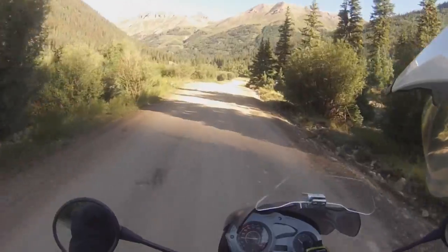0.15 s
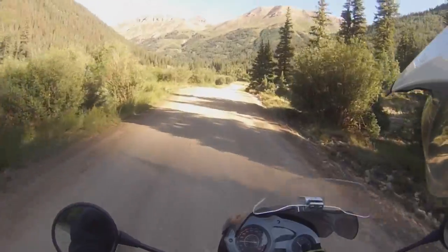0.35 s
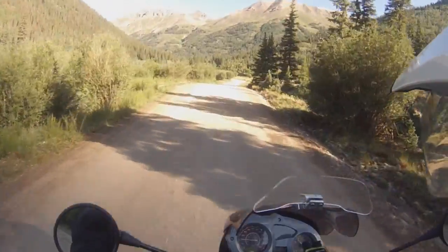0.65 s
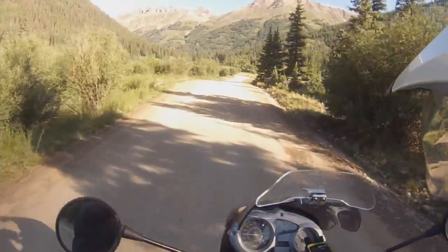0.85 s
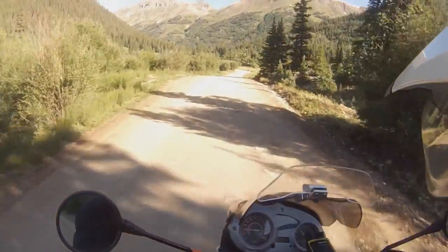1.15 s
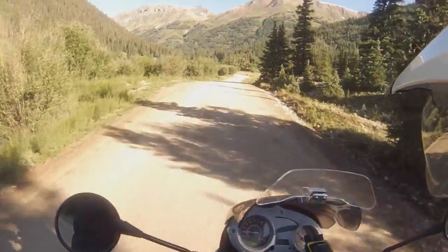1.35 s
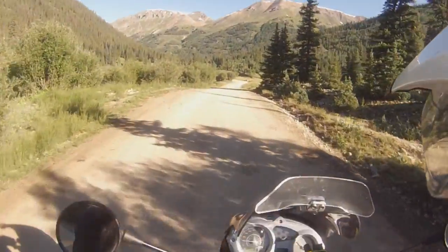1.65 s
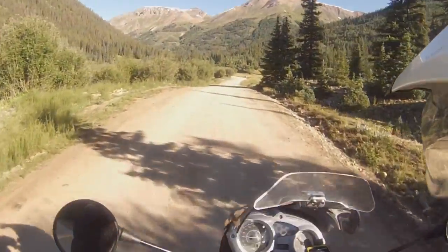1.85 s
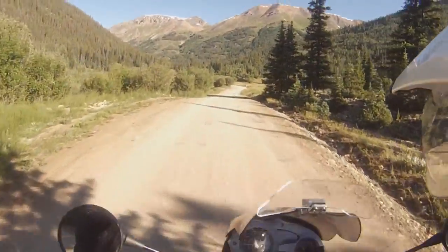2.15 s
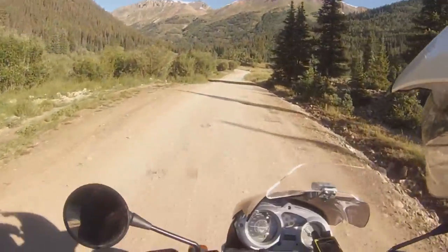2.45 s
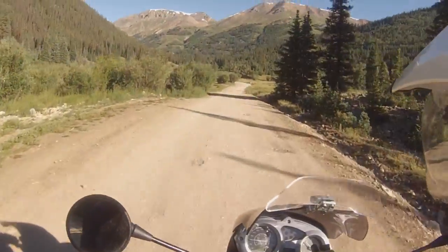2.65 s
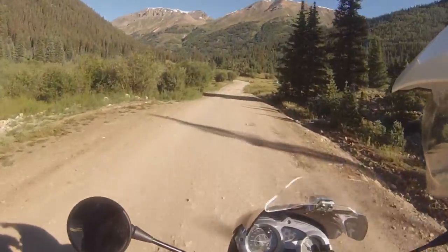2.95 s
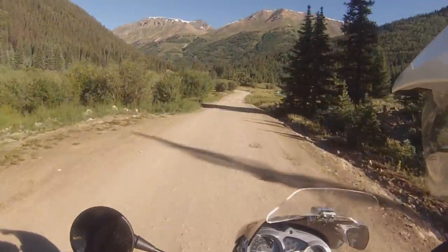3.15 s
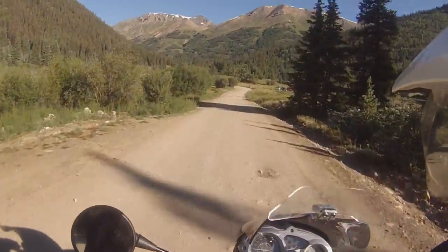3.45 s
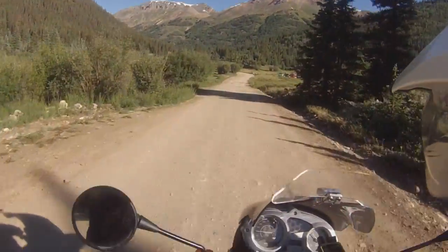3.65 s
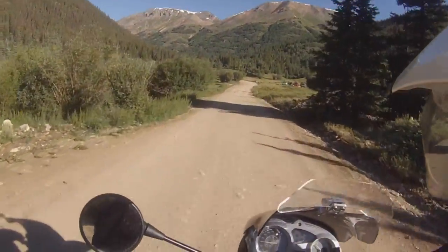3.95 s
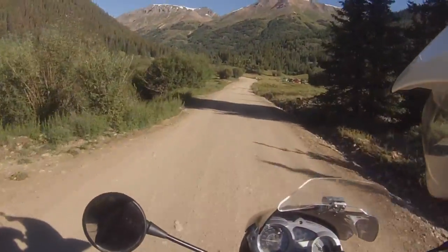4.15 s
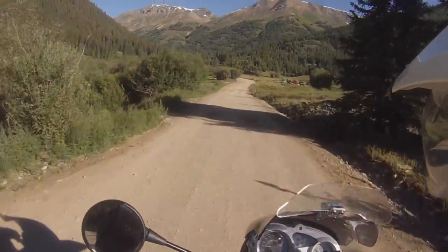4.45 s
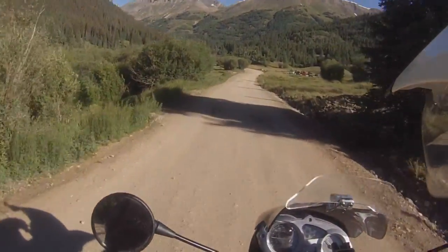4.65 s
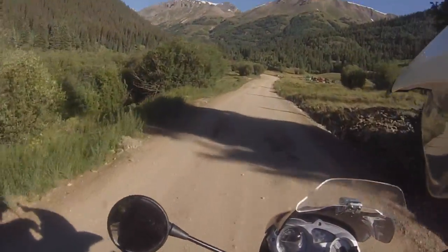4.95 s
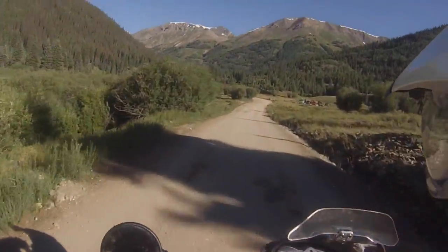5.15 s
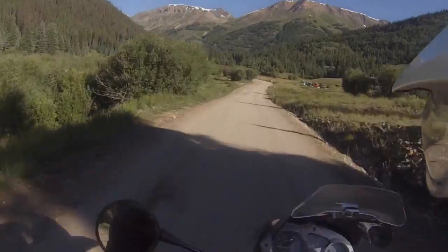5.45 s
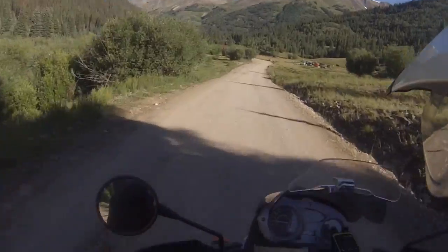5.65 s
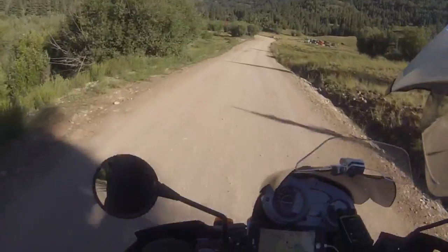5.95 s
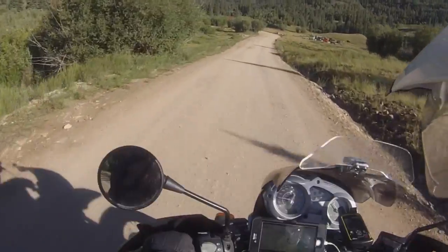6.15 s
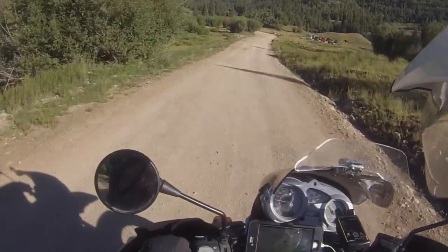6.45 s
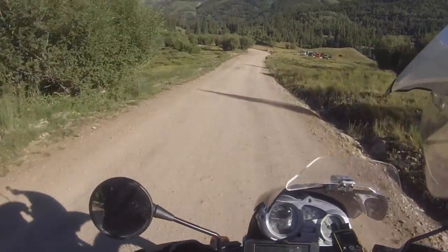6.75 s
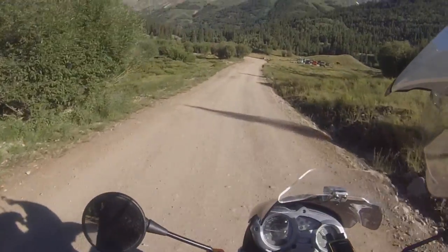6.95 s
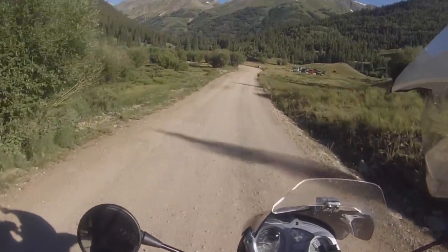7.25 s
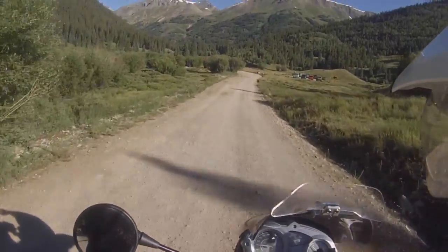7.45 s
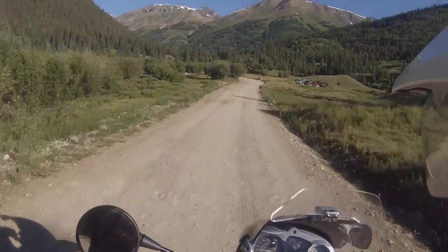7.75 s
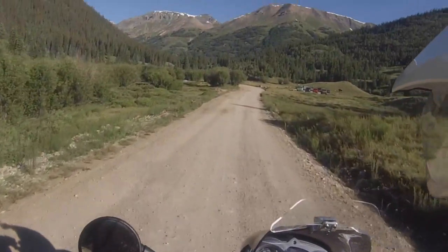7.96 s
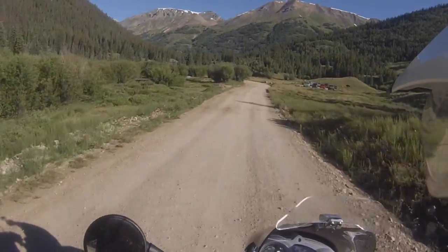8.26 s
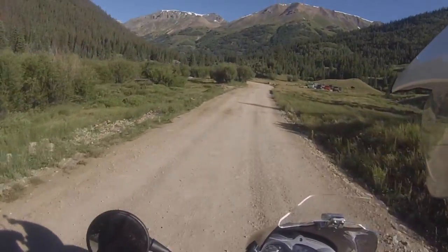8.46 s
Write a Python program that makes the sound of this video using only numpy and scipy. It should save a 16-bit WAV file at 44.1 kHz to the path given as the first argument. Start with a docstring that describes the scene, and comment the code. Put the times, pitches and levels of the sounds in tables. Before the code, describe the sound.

Even, rattly motorcycle drone heard from inside a closed case on the rider, with deep fluttering thumps, soft hiss and a sudden jolt with knocks.

```python
"""On a gravel road a single-cylinder motorcycle cruises, heard inside a closed case worn by the rider.
Engine clatter and grit are noise pulsed by the crank and filtered by the case's resonances; the case nods
on its mount as a wandering sine near 36 Hz, with slower swings and hard knocks at a bump. Shaped noise gives
the wind's buffeting, rumble and hiss; panels drum and hum, and faint exhaust lines follow the crank."""
import sys
import numpy as np
from scipy import signal
from scipy.fft import rfft, irfft, next_fast_len
from scipy.io import wavfile
from scipy.ndimage import uniform_filter1d, map_coordinates

SR = 44100
rng = np.random.default_rng(int(sys.argv[2]) if len(sys.argv) > 2 else 0)


def digitize_waveform(pressure):
    """Quantize a signal to 16-bit integers and store it at the path in sys.argv[1].

    Rows of a 2-D input are taken as channels; values are limited to [-1, 1].
    """
    field = np.atleast_2d(pressure).T
    bounded = np.clip(field, -1, 1)
    quanta = np.round(bounded * 32767).astype(np.int16)
    wavfile.write(sys.argv[1], SR, quanta)


N = 380141
T = np.arange(N) / SR  # time [s]

# rotation of the crank: time_s, turns_hz
CRANK = [(0, 43.2), (3.5, 42.5), (5.2, 43.2), (6.3, 43.4), (7.0, 44.2), (7.6, 45.0), (8.62, 46.1)]


def undb(db):
    """Amplitude is 10 to the power of level / 20."""
    return 10 ** (np.asarray(db) / 20)


def unit(x):
    """Normalization by the root mean square."""
    return x / np.sqrt(np.mean(x ** 2))


def curve(rows):
    """Linear interpolation in time: the columns after the first, one value a sample."""
    time_s, *columns = np.transpose(rows)
    return [np.interp(T, time_s, column) for column in columns]


def walk(rate_hz):
    """Low-pass noise: random levels held for 1 / rate, smoothed by two moving averages; rms 1."""
    hold = int(SR / rate_hz)
    steps = np.repeat(rng.standard_normal(N // hold + 1), hold)
    slewed = uniform_filter1d(uniform_filter1d(steps, hold), hold)
    return unit(slewed[:N])


def wander(x, share, rate_hz):
    """Time warping: a playing speed that varies by the share (rms) shifts every resonance in pitch."""
    drift = walk(rate_hz)
    position = np.arange(N) + share * np.cumsum(drift - drift.mean())
    return map_coordinates(x, [position], order=3, mode="mirror")


def quadrature_noise(phase, rate_hz):
    """Amplitude modulation in quadrature turns two slow noises into a narrow band about a carrier; rms 1."""
    return walk(rate_hz) * np.cos(phase) + walk(rate_hz) * np.sin(phase)


def wind(points):
    """Turbulence as spectrally shaped noise: level is linear in log frequency between points; rms 1."""
    size = next_fast_len(N)
    hz = np.maximum(np.arange(size // 2 + 1) * SR / size, 1)
    point_hz, db = np.transpose(points)
    gain = undb(np.interp(np.log(hz), np.log(point_hz), db, left=-90, right=-90))
    return unit(irfft(rfft(rng.standard_normal(size)) * gain, size)[:N])


def humps(hz, modes):
    """Resonances add in power, each falling steeply away from its centre."""
    return sum(undb(db) ** 2 / (1 + ((hz - f) / width) ** 2 * 2) ** 2 for f, width, db in modes)


def case(x, size=8192):
    """Minimum-phase resonance: folding the cepstrum of the gain makes the case ring only after each push."""
    # resonances of the closed case: centre_hz, width_hz, relative_db
    case_modes = [(734, 145, -12), (973, 150, -20.5), (1240, 195, -12), (1357, 78, -7), (1435, 75, 0),
                  (1579, 162, -3), (1702, 27, -6.5), (1820, 160, -8.5), (2083, 188, -3), (2322, 136, -6),
                  (2467, 108, -4), (3293, 354, -19), (4120, 650, -26)]
    hz = np.arange(size // 2 + 1) * SR / size
    cepstrum = irfft(np.log(humps(hz, case_modes) + 1e-9) / 2, size)
    cepstrum[1:size // 2] *= 2
    cepstrum[size // 2 + 1:] = 0
    response = irfft(np.exp(rfft(cepstrum)), size)
    return signal.fftconvolve(x, response)[:N]


def hiss():
    """Broadband turbulence noise: smooth, barely flickering, slightly louder as the bike gains speed."""
    # spectral density of the hiss: frequency_hz, relative_db
    hiss_spectrum = [(1590, -18), (2700, -0.5), (2920, -3.5), (3350, -5.5), (3760, -5.5), (4490, 2.5),
                     (5990, -11.5), (6860, -6.5), (8090, -17), (12300, -21.5), (13500, -24.5), (15000, -26)]
    base_db, rise_start_s, rise_db = -50, 6.8, .6
    rise = rise_db * np.clip(T - rise_start_s, 0, 1)  # takes one second
    flicker_db = .35 * walk(16) + 0.23 * walk(4.5)
    return undb(base_db + rise + flicker_db) * wind(hiss_spectrum)


def buffeting():
    """Low-frequency pressure fluctuation: shaped noise follows the gusts, with random flutter."""
    # level of the gusts: time_s, level_db
    gusts = [(0, -36.5), (1.45, -36), (1.58, -26.5), (2, -38), (3.8, -33), (4.9, -32.5), (5.07, -35),
             (5.23, -28.5), (5.69, -38), (6.02, -36), (6.5, -36.5), (6.72, -32), (8.62, -35)]
    # spectral density of the buffeting: frequency_hz, relative_db
    buffet_spectrum = [(2, -30), (4, -10), (6, -4), (12, -4), (17, -6), (22, 0), (31, 0), (42, -10),
                       (55, -14), (70, -22), (90, -50)]
    flutter_db = 2
    return undb(curve(gusts)[0] + flutter_db * walk(4.5)) * wind(buffet_spectrum)


def rumble():
    """Shaped noise with a slowly varying level: the broad low-to-middle part of the wind."""
    # level of the rumble's 130-330 Hz part: time_s, level_db
    rumble_levels = [(0, -43), (2, -42.5), (4.5, -44.5), (6, -43.5), (7.9, -42.5), (8.62, -41)]
    # spectral density of the rumble: frequency_hz, relative_db
    rumble_spectrum = [(26, -86), (45, -10.5), (119, -11.5), (215, -13), (326, -20), (409, -19),
                       (564, -23.5), (717, -30.5), (865, -30.5), (1100, -32.5), (1430, -52), (2420, -120)]
    lift_db = 1.5  # the whole rumble over its 130-330 Hz part
    return undb(curve(rumble_levels)[0] + lift_db + 0.96 * walk(8.3)) * wind(rumble_spectrum)


def drums():
    """Narrow-band resonance under random drive: each panel drifts in pitch and swells on its own."""
    # frame and fairing drumming in the wind: centre_hz, width_hz, rms_db
    panels = [(57, 8, -54), (71.5, 7, -45), (150, 8, -52), (170.4, 14, -53.5), (217.2, 6, -50),
              (416, 64, -56)]
    pitch_share, swell_db = .01, 1
    out = 0
    for hz, width_hz, db in panels:
        phase = 2 * np.pi * np.cumsum(hz * (1 + pitch_share * walk(2.5))) / SR
        level = undb(db + swell_db * walk(3.5))
        out = out + level * quadrature_noise(phase, 2 * width_hz)
    return out


def hum():
    """Order-locked resonance: a noise band and a thin tone share a panel pitch that climbs with the engine."""
    # humming panel: time_s, band_db (3 dB above the band's rms), tone_db (rms)
    hum_levels = [(0, -51, -64), (1.2, -50, -63), (2.5, -53, -64), (4, -53, -64), (5.3, -51, -64),
                  (5.6, -47, -58), (5.9, -51, -63), (6.3, -52, -55), (6.6, -50, -55), (7.0, -47, -53),
                  (7.25, -52, -60), (7.7, -52, -52), (8.0, -51, -62), (8.45, -46, -54), (8.62, -49, -58)]
    order = 16  # multiple of the crank rate
    band_db, tone_db = curve(hum_levels)
    pitch_hz = order * curve(CRANK)[0] + 5 * walk(11)
    phase = 2 * np.pi * np.cumsum(pitch_hz) / SR
    band = undb(band_db) / np.sqrt(2) * quadrature_noise(phase, 150)
    tone = np.sqrt(2) * undb(tone_db + 2.5 * walk(18)) * np.sin(phase)
    return band + tone


def exhaust():
    """Harmonics and half orders of a periodic source: faint lines, each swelling and fading on its own."""
    # exhaust beat: order (multiple of the crank rate), rms_db
    orders = [(1, -51), (2, -51.5), (2.5, -55), (3.5, -57), (4, -60), (5, -55), (5.5, -62), (6.5, -60),
              (7, -64)]
    turns = np.cumsum(curve(CRANK)[0] * (1 + 0.00403 * walk(3))) / SR
    out = 0
    for order, db in orders:
        line = np.sin(2 * np.pi * (order * turns + rng.random()))
        out = out + np.sqrt(2) * undb(db + 2 * walk(5)) * line
    return out


def mount():
    """Low-frequency oscillation of a sprung mass: jolts swell a wandering sine, a bump adds slower swings."""
    # pitch of the case's nod on its mount: time_s, pitch_hz
    nod_pitch = [(0.0, 36.3), (0.24, 35.6), (0.36, 38.3), (0.46, 35.4), (0.79, 35.9), (0.98, 33),
                 (1.41, 32.6), (1.53, 35.9), (2.35, 36), (2.47, 37.08), (3.05, 37.23), (3.17, 35.37),
                 (5.28, 37.35), (5.42, 34.13), (5.88, 34.35), (6.0, 36.5), (6.51, 38.3), (8.62, 38.3)]
    # rough patches of road swell the nod: peak_time_s, level_db, half_length_s
    jolts = [(0.085, -32, 0.032), (.24, -31, .045), (0.623, -32, 0.11), (0.962, -36, 0.038),
             (1.16, -32.5, 0.073), (1.423, -25.5, 0.038), (1.674, -32, 0.045), (1.798, -27, 0.045),
             (1.939, -29, .05), (2.085, -25, 0.083), (2.297, -38, 0.1), (2.649, -26.5, 0.082),
             (2.933, -23.5, 0.09), (3.358, -29, 0.19), (4.05, -27, 0.18), (4.271, -34.5, 0.088),
             (4.479, -28.5, 0.11), (4.79, -25.5, 0.11), (5.071, -27, 0.093), (5.254, -21, 0.049),
             (5.526, -30, 0.037), (5.66, -29.5, 0.058), (5.992, -23, 0.037), (6.07, -32, 0.026),
             (6.225, -30, 0.13), (6.584, -27, 0.055), (6.761, -22, 0.064), (6.87, -26.5, 0.043),
             (7.038, -27, 0.12), (7.24, -31.5, 0.034), (7.43, -25.5, 0.084), (7.547, -24.5, 0.034),
             (7.771, -28.5, 0.096), (7.936, -26, 0.036), (8.021, -33, 0.071), (8.18, -29.5, .04),
             (8.338, -26, 0.068)]
    # the fork drops and rebounds: peak_time_s, peak_db, swing_hz, half_length_s
    swings = [(5.850, -11, 27.5, .036), (5.94, -16, 30, .02)]
    rest_db, flutter_db = -42, 1
    edge = 2.4  # power of each swell's fall; higher = flatter top, clearer gaps
    tail = 1.03  # the tail outlasts the rise by this factor squared
    size = undb(rest_db)
    for s, db, half_s in jolts:
        away = (T - s) / half_s / tail ** np.sign(T - s)
        size = size + undb(db) * np.exp(-np.abs(away) ** edge)
    size = size * undb(flutter_db * walk(20))
    phase = 2 * np.pi * np.cumsum(curve(nod_pitch)[0] + 0.732 * walk(11)) / SR
    nod = np.sqrt(2) * size * np.sin(phase)
    for s, peak_db, swing_hz, half_s in swings:
        envelope = np.exp(-((T - s) / half_s) ** 4)
        nod = nod + undb(peak_db) * envelope * np.cos(2 * np.pi * swing_hz * (T - s))
    return nod


def knocks():
    """Impact excitation: a noise snap, a loose part's brief chatter, a wall thud and the case's rattle."""
    # knocks on the case: start_s, peak_db, chatter_hz, chatter_length_s,
    # then gains under the peak: snap_db, rattle_db, thud_db
    hits = [(3.870, -27, 1700, 0.003, -27.5, -6, -17), (5.7908, -22, 1330, 0.006, -25, -7, -12),
            (5.7972, -17, 1500, 0.0028, -16, -6, -12), (6.004, -31, 2300, 0.003, -18, -5, -6),
            (6.0062, -24.5, 1480, 0.0045, -24, -3, -11)]
    thud_hz, thud_decay_s = 1040, .004
    ring_hz, ring_db = 7400, -4  # the snap rings briefly up here
    out, after = np.zeros(N), T[:4096]
    band = signal.butter(4, [500., 8500.], "band", fs=SR, output="sos")
    for s, peak_db, chatter_hz, length_s, snap_db, rattle_db, thud_db in hits:
        arch = np.sin(np.pi * np.clip(after / length_s, 0, 1)).clip(0)
        chatter = np.sin(2 * np.pi * chatter_hz * after) * np.sqrt(arch)
        thud = undb(thud_db) * np.sin(2 * np.pi * thud_hz * after) * np.exp(-after / thud_decay_s)
        rattle = case(rng.standard_normal(len(after)) * np.exp(-after / 0.0068))[:len(after)]
        rattle *= undb(rattle_db) / np.abs(rattle).max()
        snap = signal.lfilter([1], [1, -.7], rng.standard_normal(len(after)))  # darkened noise
        snap = snap * np.exp(-after / 0.0017)
        snap = snap + undb(ring_db) * np.sin(2 * np.pi * ring_hz * after) * np.exp(-after / .0012)
        knock = chatter + thud + rattle + undb(snap_db) * snap
        i = int(s * SR)
        out[i:i + len(after)] += undb(peak_db) * signal.sosfilt(band, knock)
    return out


def engine():
    """Source and filter: noise bursts each crank turn over the even crunch of grit excite the case."""
    # cruising clatter: time_s, level_db
    cruise = [(0, -35.5), (4, -36), (6, -36), (8.62, -34.5)]
    split_hz, pitch_share, surge_db = 1880, .005, .25
    turns = np.cumsum(curve(CRANK)[0]) / SR + .3
    turn = turns.astype(int)
    # every other turn fires and is 1 dB harder
    blow_db = 2.0 * rng.standard_normal(turn[-1] + 1)[turn] - 1.0 * (turn % 2)
    burst = undb(blow_db) * np.exp(-(turns % 1) / 0.88)
    push = (1 + 0.9 * burst) * undb(0.4 * walk(12)) * rng.standard_normal(N)
    rung = unit(case(push))
    # the lower and upper rings drift and surge apart
    lower = signal.sosfiltfilt(signal.butter(4, split_hz, fs=SR, output="sos"), rung)
    clatter = 0
    for part in (lower, rung - lower):
        clatter = clatter + undb(surge_db * walk(4.5)) * wander(part, pitch_share, 3.5)
    return clatter * undb(curve(cruise)[0])


def scene():
    """Superposition: the pressures of all sources add, in one channel."""
    air = hiss() + buffeting() + rumble() + drums()
    bike = hum() + exhaust() + engine()
    return (air + bike + mount() + knocks())[None]


def record(dry):
    """Low-pass filtering: a steep elliptic filter cuts the top."""
    top_hz = 15150
    return signal.sosfilt(signal.ellip(10, .2, 60, top_hz, fs=SR, output="sos"), dry)


dry = scene()
out = record(dry)
digitize_waveform(out)
```